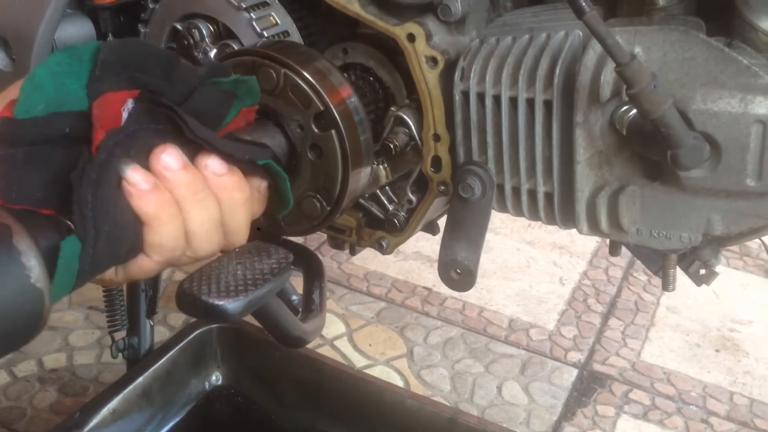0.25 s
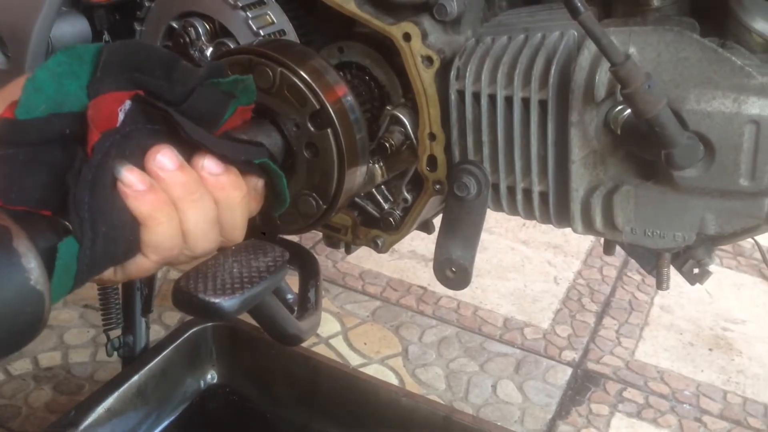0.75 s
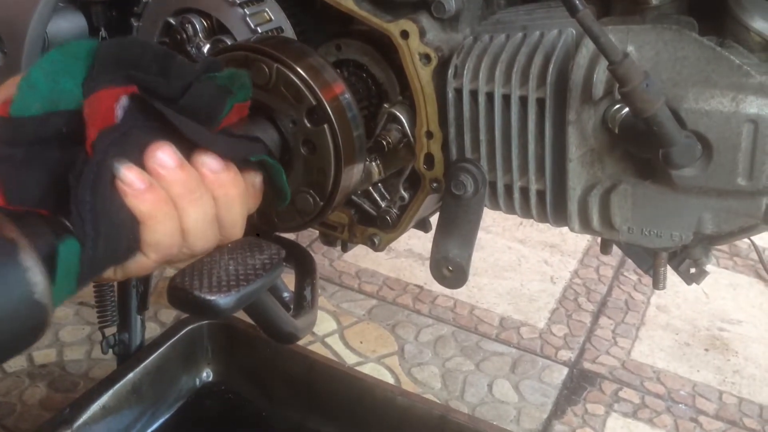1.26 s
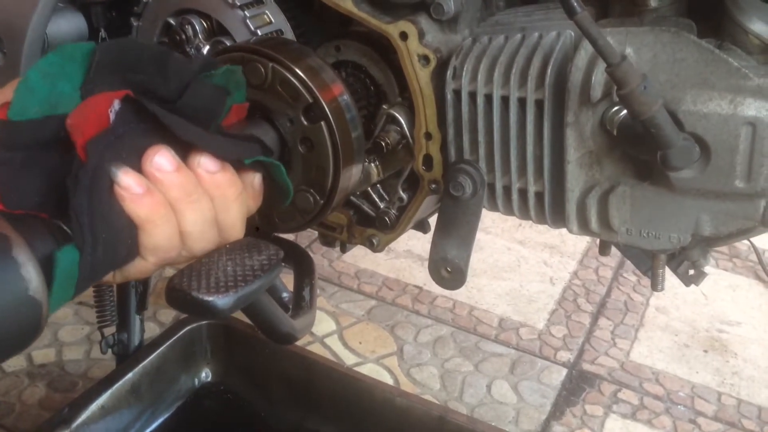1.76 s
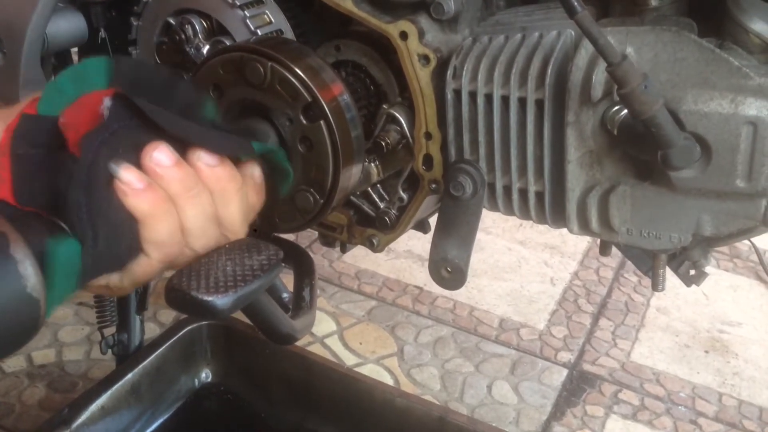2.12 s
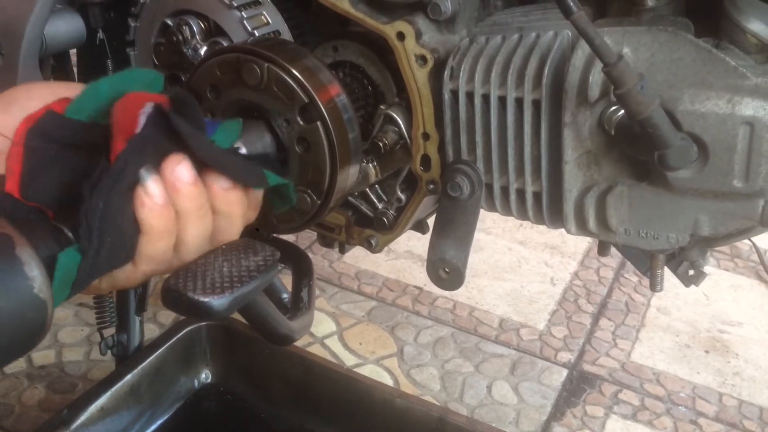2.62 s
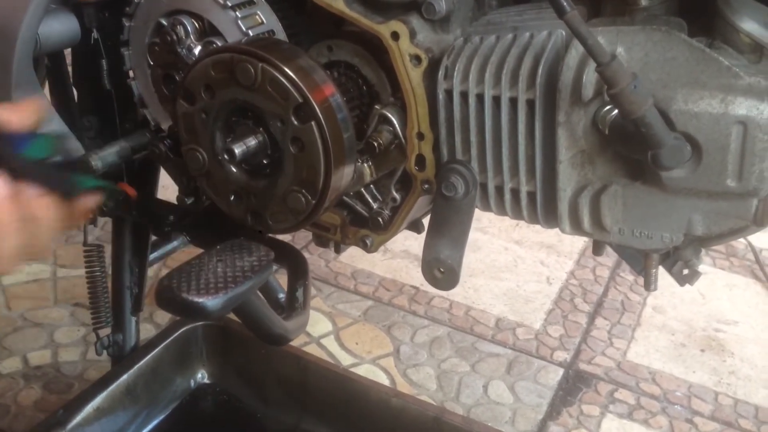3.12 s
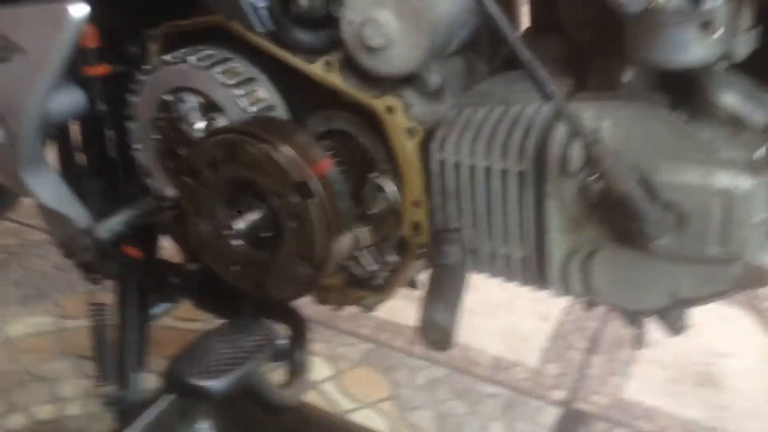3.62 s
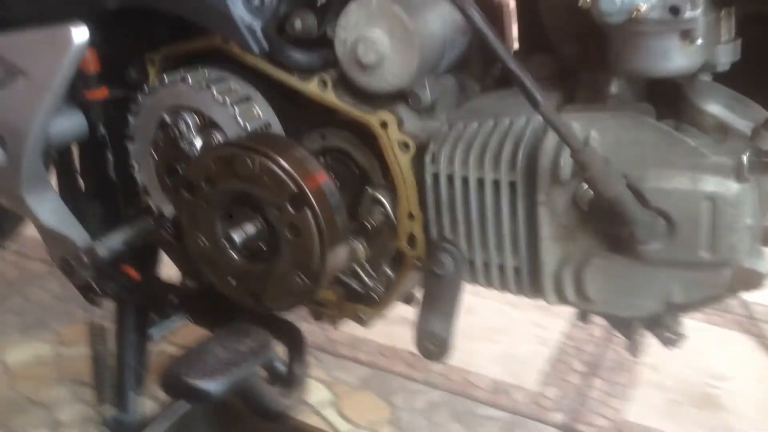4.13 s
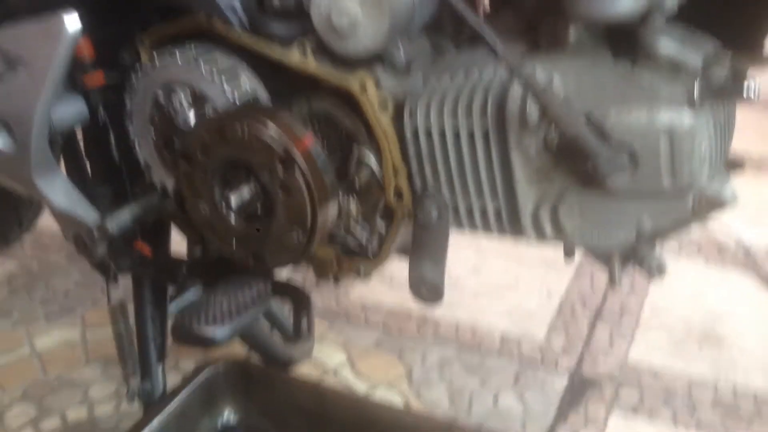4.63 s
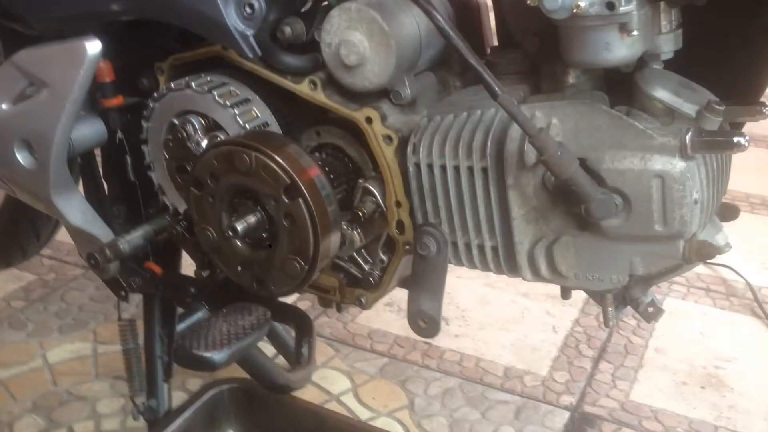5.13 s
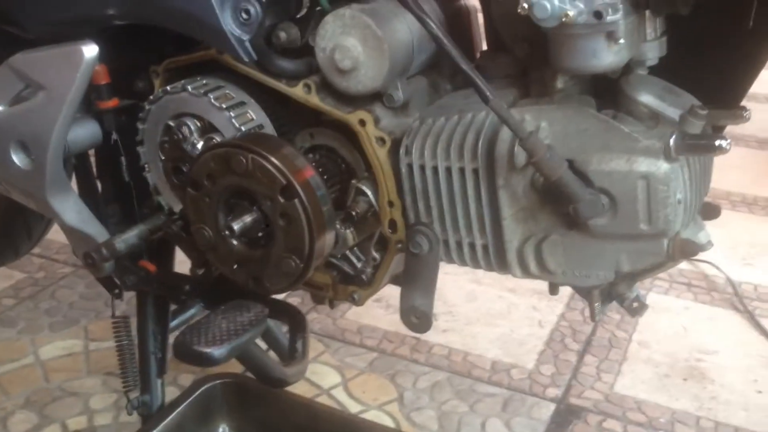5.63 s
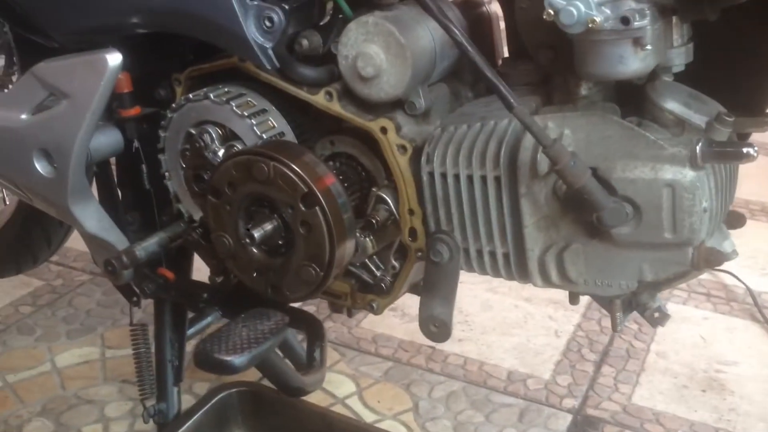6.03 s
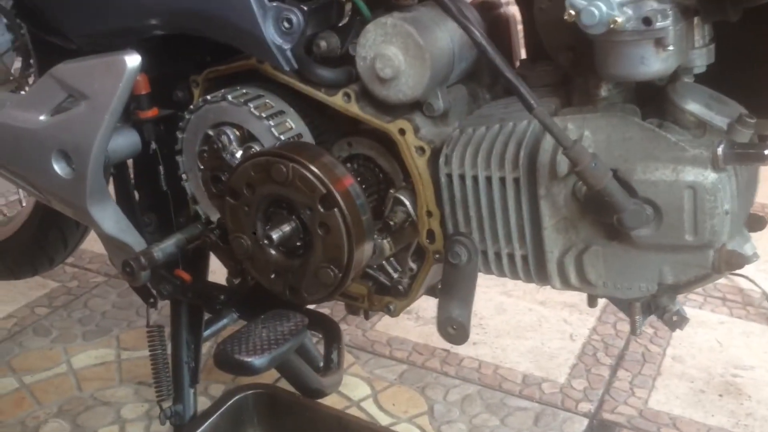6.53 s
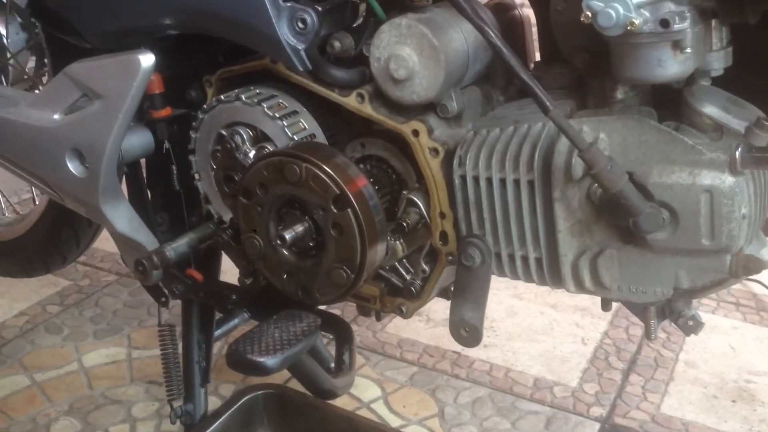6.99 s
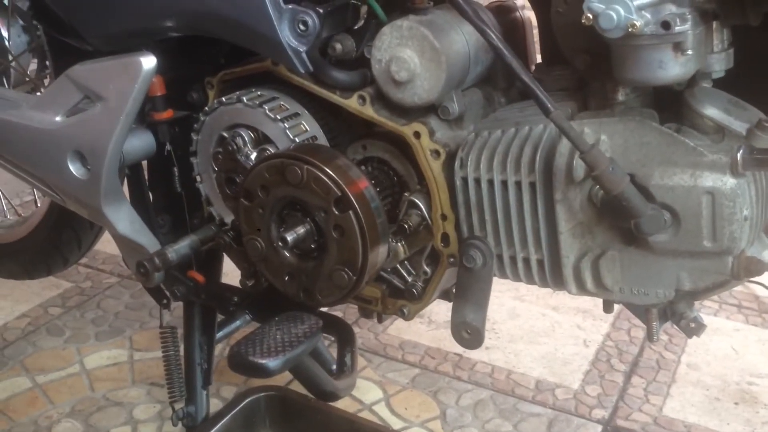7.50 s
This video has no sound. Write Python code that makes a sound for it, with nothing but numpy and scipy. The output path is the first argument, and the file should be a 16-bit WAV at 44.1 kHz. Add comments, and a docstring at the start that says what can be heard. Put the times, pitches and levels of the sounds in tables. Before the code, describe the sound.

After a quiet second of distant traffic and faint cloth rustle, three dense metallic rattles burst out in quick succession, each with hard clanks and a gear growl. A loosened nut clicks lightly. Later the tool bumps and knocks on a tiled floor, its loose innards shaking. Light ticks and tiny pings scatter over the returning street hum, heard close up with short room reverberation.

```python
"""Impact wrench on a clutch nut

An impact wrench spins the nut off a bare motorcycle clutch in three short pulls of the trigger.
Dense random impacts excite the resonances of steel and housing; short bursts of them make the clanks.
Then the tool is put down on tiles: struck modes decay as its shell and steel nose knock and small parts tick.
Shaped noise gives the sleeve, the soft bumps and the swelling far traffic; gliding sines give far engines.
A gain control gives way under loud sounds, so the street sinks after the wrench and creeps back."""
import sys
import numpy as np
from scipy import signal
from scipy.fft import rfft, irfft
from scipy.io import wavfile
from scipy.ndimage import uniform_filter1d

SR = 44100
rng = np.random.default_rng(int(sys.argv[2]) if len(sys.argv) > 2 else 0)


def master_out(mix):
    """Clip the mix to full scale and print it as 16-bit PCM to the path in sys.argv[1]."""
    frames = np.transpose(np.atleast_2d(mix))
    ceiling = np.clip(frames, -1, 1)
    pcm = np.round(ceiling * 32767).astype(np.int16)
    wavfile.write(sys.argv[1], SR, pcm)


N = 341995
TIME = np.arange(N) / SR  # s
MODE_SPREAD_DB = 1.5  # usual random spread of a mode's strength from tap to tap

# All levels in the tables are relative, before the common gains of the layer that uses them.
# Trigger pulls. Each row: start in seconds, braking in seconds, steel rattle in dB, gear growl in dB,
# fall of level in dB per second (negative rises), spin-up time in seconds, gear take-up in dB.
TRIGGER_PULLS = [(1.271, 1.422, -11.5, -11.5, 48, 0.0053, -19), (1.672, 1.81, -13.5, -12.5, 29, 0.0079, -9),
                 (2.026, 2.165, -15.5, -15.5, -4, 0.005, -13)]
# Clanks of the socket on the nut. Each row: start in seconds, steel level in dB, housing level in dB.
SOCKET_CLANKS = [(1.273, -3.5, -27.5), (1.2974, -7.5, -27), (1.343, -2.5, -5.5), (1.4092, -2, -6),
                 (1.667, -6.5, -19), (1.6896, 1, -13.5), (1.7321, -2.5, -7.5), (1.8023, 1.5, -16),
                 (2.0215, -19, -20), (2.077, -2, -6), (2.0969, 1.5, -9), (2.1544, -5.5, -10)]
# Socket, nut and clutch drum. Each row: frequency in Hz, bandwidth in Hz, level in dB.
STEEL_RESONANCES = [(2200, 150, -29), (2610, 110, -3), (3290, 60, -9), (3500, 130, -3.5), (3734, 44, 2),
                    (3836, 210, 4), (4400, 90, -4), (4500, 100, -2), (4830, 110, -2.5), (5480, 115, 1.5),
                    (5830, 90, -11), (6140, 140, -1), (7500, 200, 2.5), (8980, 130, -14.5),
                    (12600, 200, -2), (14200, 320, 5.5)]
# Spectrum of steel scraping on steel. Each row: frequency in Hz, level in dB.
RASP_SPECTRUM = [(300, -49.5), (1500, -6), (2200, -18.5), (2800, 0), (3800, 6), (5200, 5.5), (7400, 0.5),
                 (8600, 0), (10000, -2.5), (12500, 5), (14300, 8), (15800, 2.5)]
# Spectrum of a hard clank. Each row: frequency in Hz, level in dB.
CLANG_SPECTRUM = [(400, -24), (1600, 2), (2200, -4.5), (2800, -4), (3800, -0.5), (5200, 0.5), (6500, -5),
                  (7400, 2.5), (8500, -11.5), (10000, -5.5), (12500, -5), (13400, 2), (14400, 3.5),
                  (15700, -2.5)]
# Wrench housing and crankcase. Each row: frequency in Hz, bandwidth in Hz, level in dB.
HOUSING_RESONANCES = [(107, 50, -11), (172.3, 19, 3.5), (312, 200, -10), (388, 65, -5.5), (519.4, 73, -3),
                      (622, 55, 1.5), (752, 51, -1), (943, 70, 4), (1012, 40, 4.5), (1152, 170, 1),
                      (1530, 55, -5), (1620, 110, -9), (2212, 170, -2.5)]
# Engine in its frame. Each row: frequency in Hz, level in dB, decay time T60 in seconds.
FRAME_MODES = [(109, -4, 0.029), (161, -8.5, 0.048), (181.5, -10.5, 0.16), (242.8, -6, 0.061),
               (396, -9, 0.017)]
# Gear train. Each row: frequency in Hz, level in dB, decay time T60 in seconds.
GEARBOX_MODES = [(1030, -4.5, 0.064), (1210, 0, 0.013), (1357, -7, .03)]

# The tool knocks on the floor. Each row: start in seconds, plastic shell in dB, steel nose in dB.
FLOOR_KNOCKS = [(4.24, -8, -35), (4.3100, -12, -36), (4.3527, -18.5, -41.5), (4.370, -40, -36),
                (4.4512, -17, -46), (4.4772, -24, -25.5), (4.5053, -26.5, -56)]
# Plastic shell. Each row: frequency in Hz, level in dB, decay time T60 in seconds.
SHELL_MODES = [(164, -23, 0.27), (570, -4.5, 0.031), (599, -5, 0.084), (873, 6, 0.017), (1060, -19, 0.026),
               (1110, -3.5, 0.036), (1505, -8.5, 0.025), (1566, -8, 0.047), (2100, -13.5, 0.025)]
# Spectrum of the shaking innards. Each row: frequency in Hz, level in dB.
INNARDS_SPECTRUM = [(100, -17), (250, -4), (420, -1.5), (620, 3), (900, 1), (1200, -1), (1420, -13),
                    (1620, -8), (2100, -14), (3000, -16)]
# Steel nose of the tool. Each row: frequency in Hz, level in dB, decay time T60 in seconds.
NOSE_MODES = [(3230, -21, 0.061), (4040, 4, 0.018), (4400, -2, 0.017), (5150, -10, 0.05),
              (5930, -5.5, 0.036), (6605, -9.5, 0.051), (9300, -10.5, 0.06)]
# Retaining ring of the socket. Each row: frequency in Hz, level in dB, decay time T60 in seconds.
CIRCLIP_MODES = [(8520, -6, 0.14), (8700, -5.5, 0.073)]

# Light contacts of loose parts. Each row: start in seconds, peak in dB (unused), click in dB,
# dull body in dB, ping in dB relative to the click.
PART_TICKS = [(0.188, -33, -50, -48, 2), (1.871, -28, -43, -38.5, 2), (2.857, -35, -44.5, -53, -1),
              (3.271, -40, -51, -57, 1), (3.594, -33, -41, -68, 5.5), (4.865, -33, -45.5, -47.5, 4),
              (4.97, -35, -49, -55, -1), (5.023, -38, -49.5, -47, 3), (5.125, -37, -45.5, -48.5, 4.5),
              (5.273, -38, -50.5, -57, 3), (6.073, -30, -41.5, -49.5, 5.5), (6.187, -31, -44.5, -43, 3),
              (6.284, -30, -40.5, -46, 4.5), (6.712, -28, -44.5, -37, 1.5), (7.691, -33, -55, -40, 2)]
# Spectrum of a click. Each row: frequency in Hz, level in dB.
CLICK_SPECTRUM = [(500, 12.5), (2000, -17), (2800, 4.5), (4300, 2.5), (5500, -3), (6500, -0.5), (7600, -13),
                  (8900, -5.5), (10300, -10), (14200, -18), (16000, -20)]
# Spectrum of the dull body of a click. Each row: frequency in Hz, level in dB.
DULL_SPECTRUM = [(100, -21.5), (400, 3.5), (680, 3.5), (900, 3), (1350, -2), (2100, -3), (3200, -16),
                 (8000, -41.5)]
# Brief ring of the ticking parts. Each row: frequency in Hz, bandwidth in Hz, level in dB.
TICK_RESONANCES = [(1418, 73, -5), (3700, 150, -3), (4185, 110, -7), (4570, 140, 2.5), (5080, 250, -1.5),
                   (8770, 200, -8)]
# Taps on the freed socket. Each row: start in seconds, socket in dB, retaining ring in dB.
FREE_SOCKET_TAPS = [(2.2342, -26.5, -27.5), (2.2976, -29.5, -54)]
# Socket. Each row: frequency in Hz, level in dB, decay time T60 in seconds.
SOCKET_MODES = [(4750, -6.5, 0.044), (5500, -23, 0.048), (7730, -14, .03), (7700, 6.5, 0.013),
                (8495, -21, 0.038), (10600, -10, .03), (11650, -13, .04), (12340, -11, .04)]
# The nut slips off the shaft end. Each row: start in seconds, level in dB.
NUT_STRIKES = [(2.698, -46.5), (2.8585, -31), (4.2535, -34)]
# Nut. Each row: frequency in Hz, level in dB, decay time T60 in seconds.
NUT_MODES = [(1750, -10, 0.047), (2155, -0.5, 0.028), (13250, 0, 0.023), (13600, -8.5, .02),
             (14600, -13, 0.078), (14230, 8.5, 0.021)]
# A washer clinks. Each row: start in seconds, level in dB.
WASHER_STRIKES = [(4.9615, -39)]
# Washer. Each row: frequency in Hz, level in dB, decay time T60 in seconds.
WASHER_MODES = [(8296, -12, 0.09), (9545, -20, 0.15), (11690, 0.5, 0.097), (14300, 0, 0.1),
                (14830, -14, 0.17)]
# A small spring pings. Each row: start in seconds, level in dB.
SPRING_STRIKES = [(5.211, -50)]
# Spring. Each row: frequency in Hz, level in dB, decay time T60 in seconds.
SPRING_MODES = [(4050, 1, 0.15), (8107, -15, .15)]

# A sleeve brushes past. Each row: centre in seconds, level in dB, standard deviation in seconds.
SLEEVE_RUSTLES = [(.22, -55, 0.038), (.88, -52, 0.024), (3.05, -51, 0.012), (3.60, -51, 0.044),
                  (3.74, -61, 0.093), (3.93, -44.5, 0.032), (4.225, -48, 0.028), (4.37, -57, 0.12)]
# Spectrum of rubbing cloth. Each row: frequency in Hz, level in dB.
CLOTH_SPECTRUM = [(800, -12), (2000, -6), (4300, -2), (7000, -9), (10000, -10), (14500, -6), (16000, -11)]
# Soft bumps of the handled tool. Each row: centre in seconds, level in dB, standard deviation in seconds.
SOFT_BUMPS = [(3.07, -40, 0.033), (4.222, -37.5, 0.012), (4.277, -30.5, 0.023)]
# Spectrum of a soft bump. Each row: frequency in Hz, level in dB.
BUMP_SPECTRUM = [(50, 4), (110, -19), (155, 14), (240, -1), (350, -0.5), (550, -4), (1000, -9), (3000, -28)]

# Traffic, used as its departure from the mean; two lists of rows. Each row: time in seconds, level in dB.
TRAFFIC_LEVEL = [
    [(0.0, -52.5), (0.1, -53), (0.67, -54), (1.2, -53.5)],
    [(4.6, -55), (5.01, -53), (5.46, -54.5), (6.72, -51), (7.75, -52)],
]
# Rumble, tyre noise and hiss in turn. Each row: level in dB at mean traffic, rise in dB per dB of traffic.
STREET_LEVELS = [(-50.5, 2.17), (-52.5, 1.4), (-58, 2)]
# Spectrum of traffic rumble. Each row: frequency in Hz, level in dB.
RUMBLE_SPECTRUM = [(30, -31.5), (50, -14.5), (70, -4), (112, 2.5), (165, 0), (200, -4), (370, -5),
                   (450, -11), (600, -33)]
# Spectrum of tyre noise. Each row: frequency in Hz, level in dB.
TYRE_SPECTRUM = [(250, -18), (430, -4), (600, -1), (780, 1.5), (1100, -1), (1400, -4), (1620, -4),
                 (2050, -2.5), (2500, -9), (3500, -32)]
# Spectrum of the street's hiss. Each row: frequency in Hz, level in dB.
HISS_SPECTRUM = [(1470, -52), (2500, -0.5), (2820, 0.5), (3320, 1.5), (3610, 0), (4360, 2), (7560, -10.5),
                 (10300, -14.5), (14700, -8.5), (15500, -8.5)]
# Hums and whines of far engines. Each row: start in seconds, end in seconds, first pitch in Hz,
# last pitch in Hz, level in dB; pitch and level waver about these.
ENGINE_GLIDES = [(2.55, 3.27, 153, 152, -48), (5.6, 6.053, 508, 514, -57), (6.72, 7.55, 1540, 1260, -58),
                 (6.4, 7.5, 3380, 3250, -64)]
# Workshop reverberation. Each row: frequency in Hz, decay time T60 in seconds.
ROOM_DECAY = [(150, 0.35), (1000, 0.23), (5000, 0.22), (14000, 0.17)]


def from_db(db):
    """Amplitude ratio is ten to the power of a twentieth of the level in decibels."""
    return 10 ** (np.asarray(db) / 20)


def rms_one(x):
    """Normalisation divides a signal by its root mean square."""
    return x / np.sqrt(np.mean(x ** 2) + 1e-20)


def at_hz(points, hz):
    """Linear interpolation reads a table on a logarithmic frequency axis."""
    table_hz, value = np.transpose(points)
    return np.interp(np.log(np.maximum(hz, 1)), np.log(table_hz), value)


def through(x, response):
    """Convolution passes a force through an impulse response scaled to unit energy."""
    return signal.oaconvolve(x, response / np.linalg.norm(response))[:N]


def colour(x, spectrum, size=4096):
    """Folding the cepstrum gives the causal, minimum-phase filter of a given spectrum."""
    gain = from_db(at_hz(spectrum, np.fft.rfftfreq(size, 1 / SR)))
    cepstrum = irfft(np.log(gain))
    cepstrum[1:size // 2] *= 2
    cepstrum[size // 2 + 1:] = 0
    return through(x, irfft(np.exp(rfft(cepstrum))))


def resonate(x, resonances, size=8192):
    """Parallel resonances of alternating sign decay at a rate set by their bandwidth."""
    t = TIME[:size]
    response = np.zeros(size)
    for k, (hz, width_hz, db) in enumerate(resonances):
        decay = np.exp(-np.pi * width_hz * t)
        response += (-1) ** k * from_db(db) * width_hz * decay * np.cos(2 * np.pi * hz * t)
    return through(x, response)


def ring_modes(resonances):
    """Bandwidth and decay time are inverse: resonances become modes in Hz, dB and T60."""
    return [(hz, db, np.log(1000) / (np.pi * width_hz)) for hz, width_hz, db in resonances]


def struck(taps, modes, spread_db, size=16384):
    """Modal synthesis: each tap rings every mode, in alternating sign and with its own random strength."""
    out, t = np.zeros(N + size), TIME[:size]
    rings = np.array([(-1) ** k * from_db(db - 60 * t / t60) * np.sin(2 * np.pi * hz * t)
                      for k, (hz, db, t60) in enumerate(modes)])
    for start, db in taps:
        at = round(start * SR)
        strengths = from_db(db + spread_db * rng.standard_normal(len(modes)))
        out[at:at + size] += strengths @ rings
    return out[:N]


def grains(per_s, spread_db):
    """A random pulse train of tiny impacts, uneven in size and sign, has an rms of 1."""
    born = rng.random(N) < per_s / SR
    sign = rng.choice([-1, 1], N)
    return rms_one(born * sign * from_db(spread_db * np.clip(rng.standard_normal(N), -2, 2)))


def contacts(times, levels_db, length, fade_s, lead=0.047, size=8192):
    """A contact force grows exponentially over a share (lead) of its length, holds, then fades."""
    out = np.zeros(N)
    for start, db in zip(times, levels_db):
        at = round(start * SR)
        near = slice(max(at - size, 0), at + size)
        t = TIME[near] - start
        build = np.minimum(t, 0) / (lead * length)
        fade = np.maximum(t - length, 0) / fade_s
        out[near] += from_db(db) * np.exp(build - fade)
    return out


def swells(rows):
    """Gaussian envelopes rise and fall smoothly."""
    return sum(from_db(db) * np.exp(-.5 * ((TIME - centre) / sigma) ** 2) for centre, db, sigma in rows)


def wander(per_s):
    """Random modulation: normal values joined by straight lines."""
    return np.interp(TIME * per_s, np.arange(N), rng.standard_normal(N))


def wrench():
    """Dense impacts of gears and loose socket excite resonances; each clank is a burst of steel chatter."""
    times, steel_db, housing_db = np.transpose(SOCKET_CLANKS)
    clank_s = 0.003  # hold time before the fade
    wobble = from_db(1.2 * wander(per_s=690))  # the loose socket presses on unevenly
    rattle = wobble * drive(brake_s=.01, column="steel") * grains(per_s=7000, spread_db=7.0)
    chatter = grains(per_s=20000, spread_db=1.5)
    clanks = contacts(times, steel_db, clank_s, fade_s=0.0035, lead=.4) * chatter
    scrape = colour(from_db(2.5) * rattle, RASP_SPECTRUM) + colour(from_db(-2.5) * clanks, CLANG_SPECTRUM)
    steel_ring = resonate(from_db(-17) * rattle, STEEL_RESONANCES)
    blows = from_db(-15.5) * hammer_blows(times, steel_db)
    # the sparser tooth blows and the jolt of each clank shake the housing
    teeth = wobble * drive(brake_s=0.013, column="gear") * grains(per_s=1200, spread_db=2.5)
    jolts = contacts(times, housing_db, clank_s, fade_s=0.0027, lead=0.88) * grains(per_s=7000, spread_db=1.0)
    housing = resonate(from_db(-3.5) * teeth + from_db(-2.5) * jolts, HOUSING_RESONANCES)
    return scrape + steel_ring + blows + housing + recoil(times, steel_db)


def drive(brake_s, column):
    """The drive envelope jumps up, changes steadily in dB, and decays exponentially under the brake."""
    out = np.zeros(N)
    for start, brake, steel_db, gear_db, fall_db_per_s, spin_up_s, _ in TRIGGER_PULLS:
        level_db = steel_db if column == "steel" else gear_db
        spin_up = .5 + .5 * np.tanh((TIME - start) / spin_up_s)
        coast = from_db(level_db - fall_db_per_s * np.clip(TIME - start, 0, 1))
        out += spin_up * coast * np.exp(-np.clip((TIME - brake) / brake_s, 0, 20))
    return out


def hammer_blows(times, steel_db):
    """The point of impact sets the mode strengths: each clank lands on a new spot, so its colour is new."""
    return struck(zip(times, steel_db), ring_modes(STEEL_RESONANCES), spread_db=4.5)


def recoil(times, steel_db):
    """Reaction: gears take up slack as a pull starts; clanks kick the engine, less as the pull goes on."""
    starts, *_, take_up_db = np.transpose(TRIGGER_PULLS)
    nearest_pull = np.argmin(np.abs(times[:, None] - starts), axis=1)
    into_pull_s = times - starts[nearest_pull]
    kick_db = steel_db - 10 - 171.5 * into_pull_s  # falls 171.5 dB per s of the pull
    kicks = struck(zip(times, kick_db), FRAME_MODES, MODE_SPREAD_DB)
    gear_slack = struck(zip(starts, take_up_db), GEARBOX_MODES, MODE_SPREAD_DB)
    frame_jolt = from_db(-18.5) * struck(zip(starts, take_up_db), FRAME_MODES, MODE_SPREAD_DB)
    return kicks + gear_slack + frame_jolt


def steel_nose():
    """Impact on tiles: the steel nose clicks and rings, and its socket and retaining ring shake."""
    times, _, nose_db = np.transpose(FLOOR_KNOCKS)
    ring = struck(zip(times, nose_db + 1), NOSE_MODES, MODE_SPREAD_DB)
    buzz = struck(zip(times, nose_db - 6.5), CIRCLIP_MODES, MODE_SPREAD_DB)
    # the loose socket jingles on after each knock
    jingle = contacts(times, nose_db - 13, length=0.0087, fade_s=0.013) * grains(per_s=1800, spread_db=2)
    return ticks(times, nose_db, nose_db - 3) + ring + buzz + colour(jingle, RASP_SPECTRUM)


def handling(soft_hz=2300):
    """A soft contact passes little treble: the shell knocks on the tiles; cloth rubs, the tool bumps softly."""
    times, knock_db, _ = np.transpose(FLOOR_KNOCKS)
    knocks = from_db(-6) * struck(zip(times, knock_db), SHELL_MODES, MODE_SPREAD_DB)
    # loose innards go on shaking after each knock
    shake = contacts(times, knock_db, length=0.016, fade_s=0.017) * grains(per_s=1800, spread_db=1.0)
    innards = from_db(-18) * colour(shake, INNARDS_SPECTRUM)
    soft_contact = signal.butter(2, soft_hz, fs=SR, output="sos")
    muffled = signal.sosfilt(soft_contact, knocks + innards)
    sleeve = swells(SLEEVE_RUSTLES) * colour(grains(per_s=8500, spread_db=3.5), CLOTH_SPECTRUM)
    bumps = swells(SOFT_BUMPS) * colour(rng.standard_normal(N), BUMP_SPECTRUM)
    return muffled + sleeve + bumps


def small_parts():
    """Free vibration after light contact: loose parts tick and ping, and small steel ones ring clearly."""
    times, _, click_db, body_db, ping_db = np.transpose(PART_TICKS)
    pings = struck(zip(times, click_db + ping_db), ring_modes(TICK_RESONANCES), spread_db=4)
    taps, socket_db, circlip_db = np.transpose(FREE_SOCKET_TAPS)
    parts = [(zip(taps, socket_db), SOCKET_MODES), (zip(taps, circlip_db), CIRCLIP_MODES),
             (NUT_STRIKES, NUT_MODES), (WASHER_STRIKES, WASHER_MODES), (SPRING_STRIKES, SPRING_MODES)]
    rings = sum(struck(hits, modes, MODE_SPREAD_DB) for hits, modes in parts)
    return ticks(times, click_db + 3, body_db + 2.5) + pings + rings


def ticks(times, click_db, body_db):
    """Brief contact noise: a dry, gritty click excites a short ring beside a dull body."""
    tick_s = 0.0015  # hold time before the fade
    grit = contacts(times, click_db, tick_s, fade_s=0.0071, lead=0.24) * grains(per_s=14000, spread_db=0.5)
    clicks = colour(grit, CLICK_SPECTRUM)
    thuds = contacts(times, body_db, tick_s, fade_s=0.012, lead=0.16) * rng.standard_normal(N)
    bodies = colour(thuds, DULL_SPECTRUM)
    return from_db(-3.0) * clicks + from_db(-6.5) * resonate(clicks, TICK_RESONANCES) + bodies


def street():
    """Many distant sources add up to noise: rumble, tyre noise and thin hiss swell with the traffic."""
    traffic_db = np.interp(TIME, *np.vstack(TRAFFIC_LEVEL).T)
    swell_db = traffic_db - traffic_db.mean()
    spectra = (RUMBLE_SPECTRUM, TYRE_SPECTRUM, HISS_SPECTRUM)
    return sum(from_db(db + follows * swell_db) * colour(rng.standard_normal(N), spectrum)
               for (db, follows), spectrum in zip(STREET_LEVELS, spectra))


def far_engines(waver=0.013, flutter_db=2.5):
    """Phase is the integral of frequency: each tone swells, glides, wavers in pitch and level, and fades."""
    out = np.zeros(N)
    for start, end, first_hz, last_hz, db in ENGINE_GLIDES:
        progress = np.clip((TIME - start) / (end - start), 0, 1)
        glide_hz = first_hz + (last_hz - first_hz) * progress
        hz = glide_hz * (1 + waver * wander(per_s=14))
        level = from_db(db + flutter_db * wander(per_s=14)) * np.sin(np.pi * progress)
        out += level * np.sin(2 * np.pi * np.cumsum(hz) / SR)
    return out


def workshop(x, echo_s, echo_db, tail_db, build_s, size=22050):
    """Reflection and reverberation: a dull floor echo, then a diffuse tail that decays by frequency band."""
    t, hz = TIME[:size], np.fft.rfftfreq(size, 1 / SR)
    white = rfft(rng.standard_normal(size))
    edges = np.append(0, np.geomspace(250, SR / 2, 8))  # band edges in Hz
    tail = np.zeros(size)
    for low, high in zip(edges, edges[1:]):
        band = irfft(white * (hz >= low) * (hz < high), size)
        tail += band * np.exp(-np.log(1000) * t / at_hz(ROOM_DECAY, (low + high) / 2))
    diffuse = through(x, tail * (1 - np.exp(-t / build_s)))
    dull = signal.sosfilt(signal.butter(1, 3000, fs=SR, output="sos"), x)
    echo = np.interp(TIME - echo_s, TIME, dull)
    return x + from_db(echo_db) * echo + from_db(tail_db) * diffuse


def gain_control(x):
    """Compression: level above a threshold cuts the gain quickly; it recovers at a steady rate in dB."""
    threshold_db, share, window_s = -19, 0.43, 0.015  # share of the excess that is cut
    attack_s, recovery_db_per_s = .004, 3
    power = uniform_filter1d(x[0] ** 2, max(round(window_s * SR), 1))
    level_db = 10 * np.log10(np.maximum(power, 1e-12))
    cut_db = share * np.maximum(level_db - threshold_db, 0)
    # a running maximum on a rising slope holds each cut and lets it shrink at that slope
    recovery_db = recovery_db_per_s * TIME
    held_db = np.maximum.accumulate(cut_db + recovery_db) - recovery_db
    lag = np.exp(-1 / (attack_s * SR))
    return x * from_db(-signal.lfilter([1 - lag], [1, -lag], held_db))


def scene():
    """Superposition: near sources sound in the workshop, with the street added behind."""
    near = wrench() + small_parts() + handling() + steel_nose()
    room = workshop(near, echo_s=0.017, echo_db=-17.5, tail_db=-11.5, build_s=0.0049)
    return (room + street() + far_engines())[None]


def record(dry, bass_cut_hz=55, top_cut_hz=15500):
    """Limited bandwidth and range: deep bass is lost, gain follows level, peaks round off, the top is cut."""
    thin = signal.sosfilt(signal.butter(2, bass_cut_hz, "high", fs=SR, output="sos"), dry)
    rounded = np.tanh(gain_control(thin) / 1.179)
    steep_cut = signal.ellip(12, .1, 80, top_cut_hz, fs=SR, output="sos")  # 0.1 dB ripple, 80 dB stop band
    return signal.sosfilt(steep_cut, rounded)


dry = scene()
out = record(dry)
master_out(out)
```